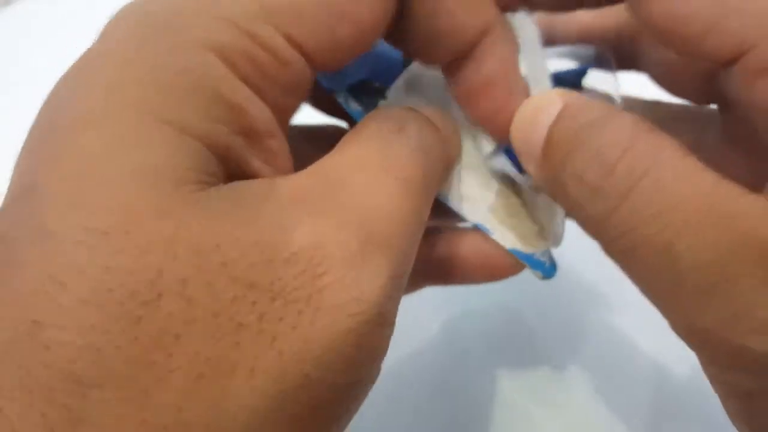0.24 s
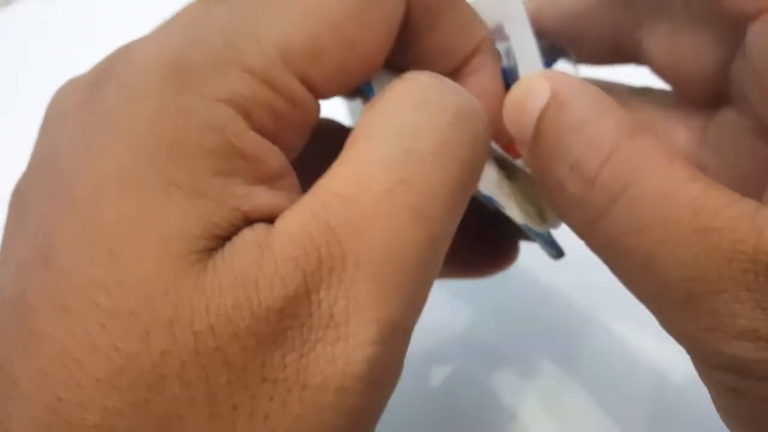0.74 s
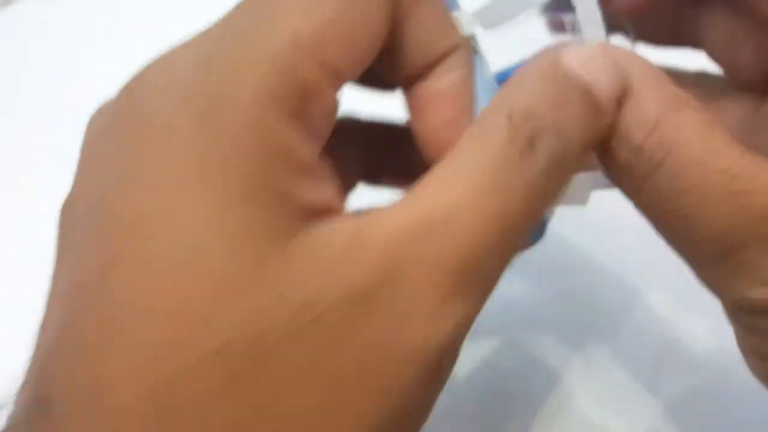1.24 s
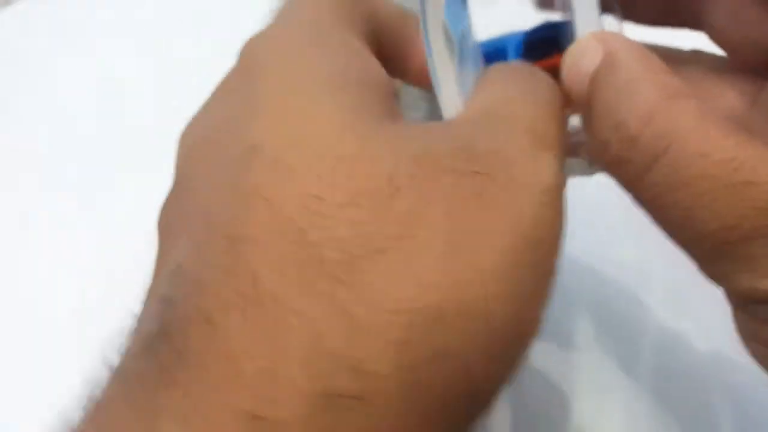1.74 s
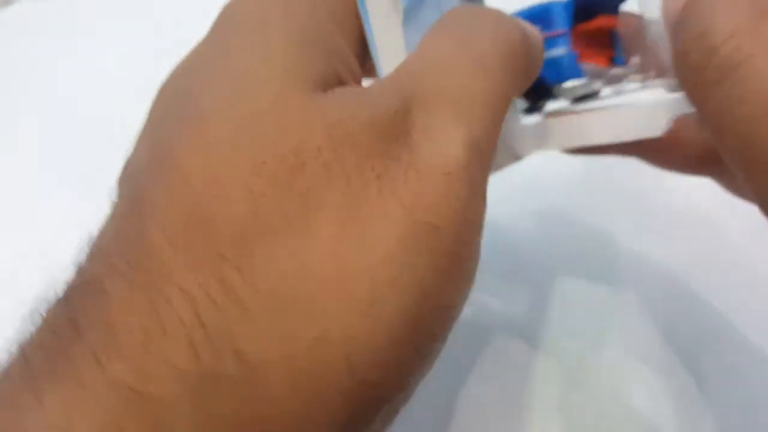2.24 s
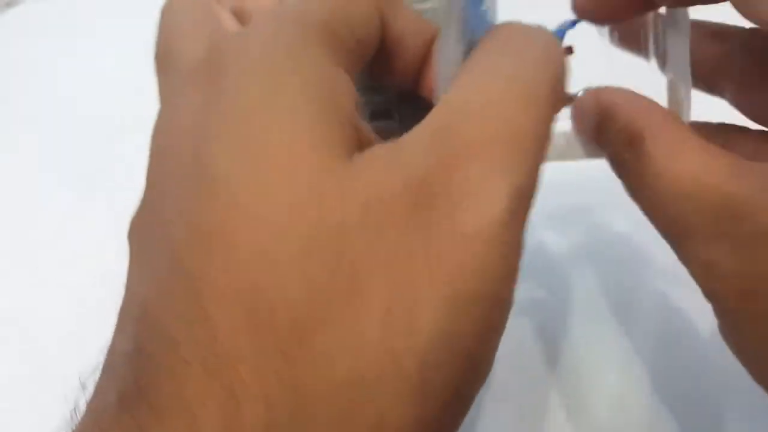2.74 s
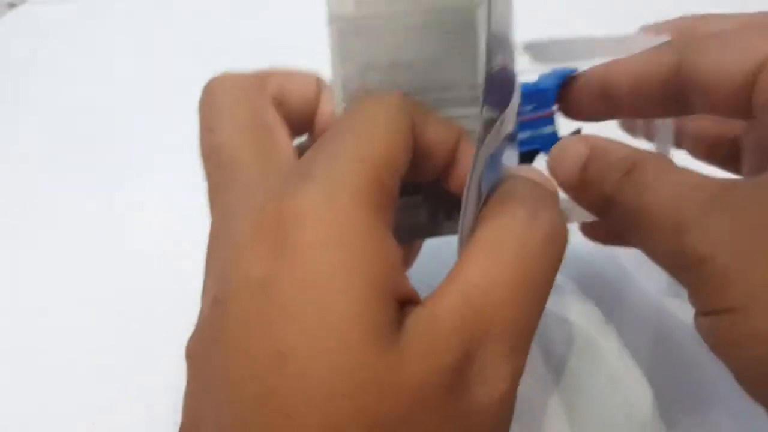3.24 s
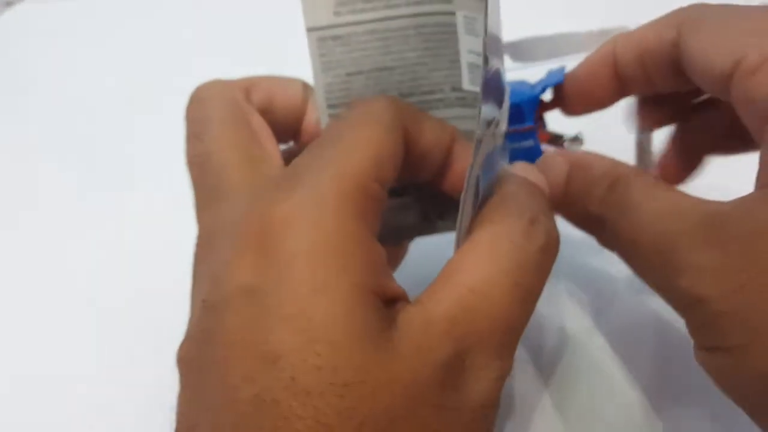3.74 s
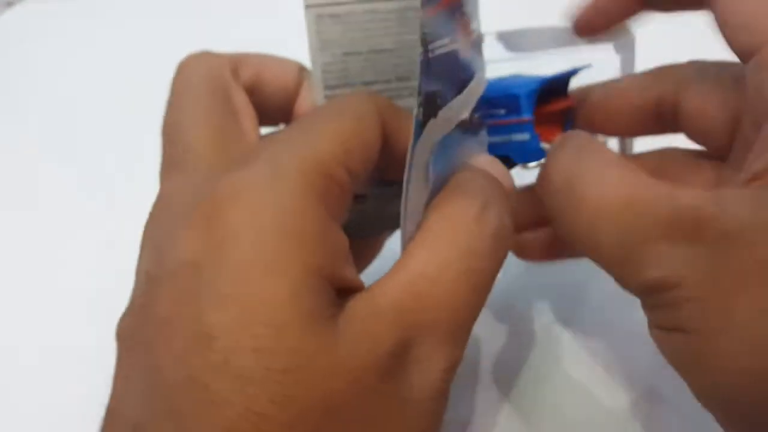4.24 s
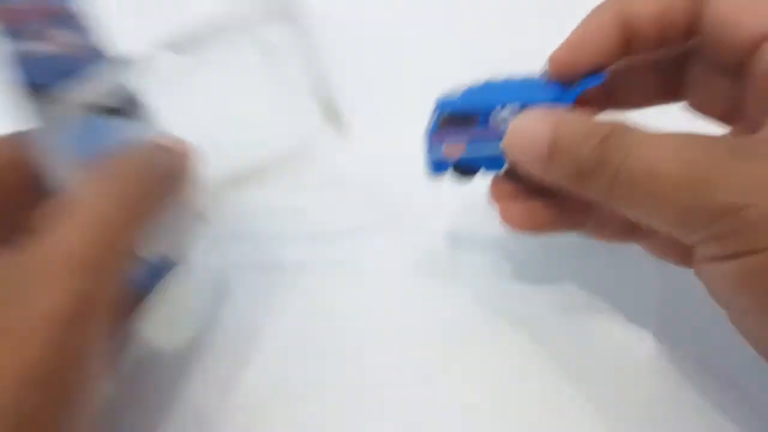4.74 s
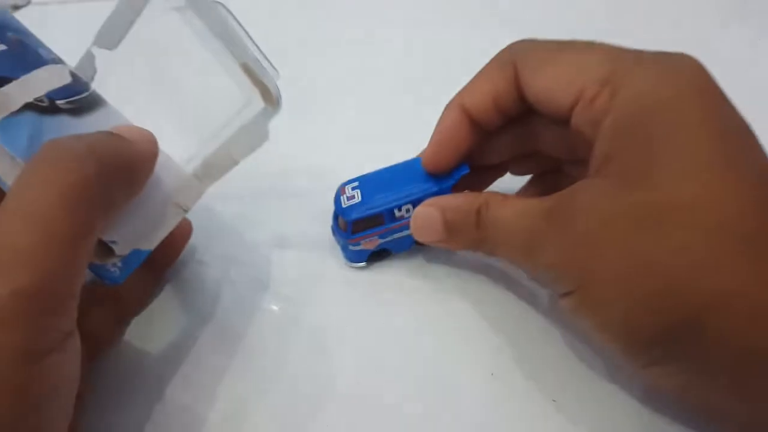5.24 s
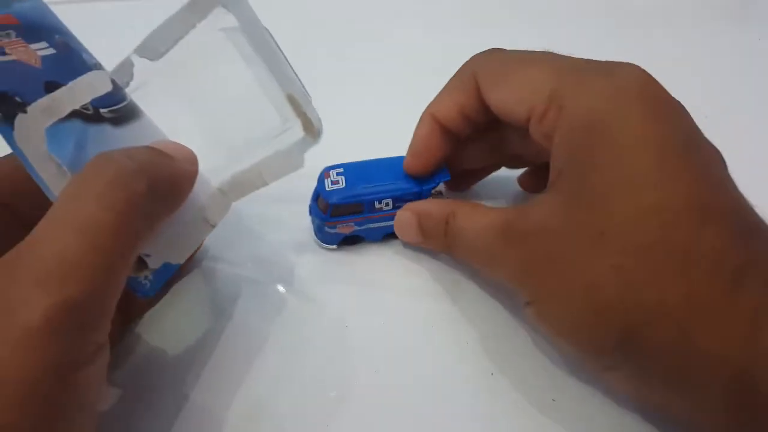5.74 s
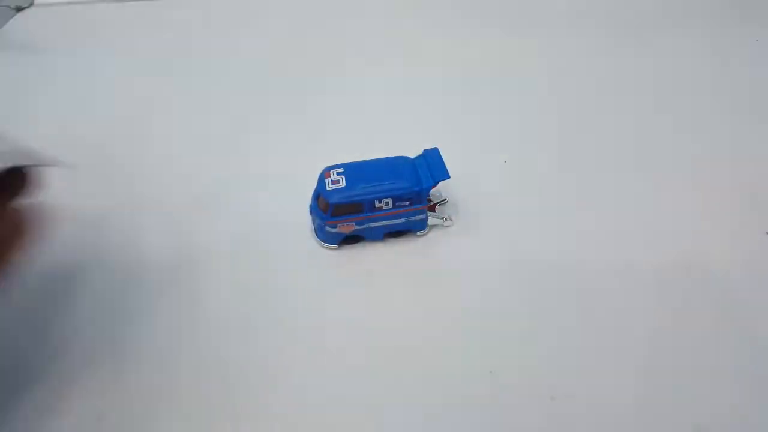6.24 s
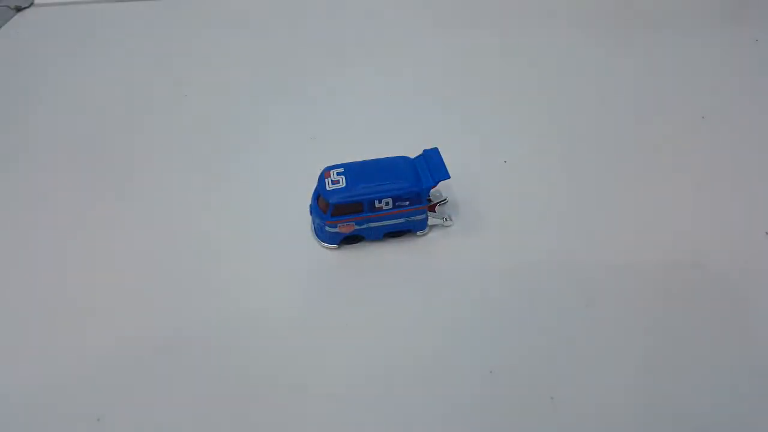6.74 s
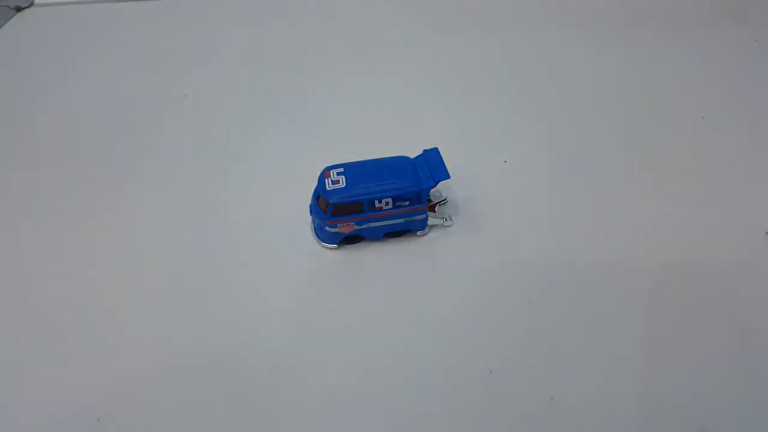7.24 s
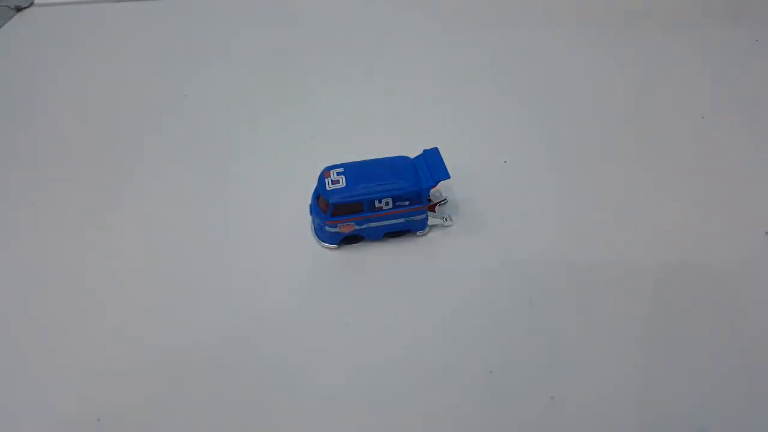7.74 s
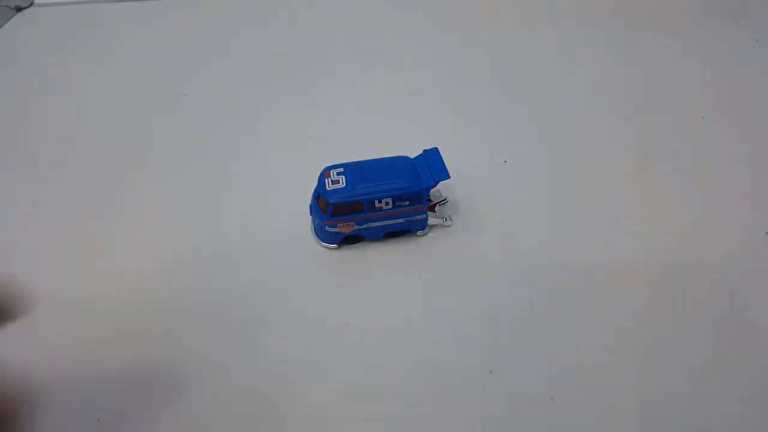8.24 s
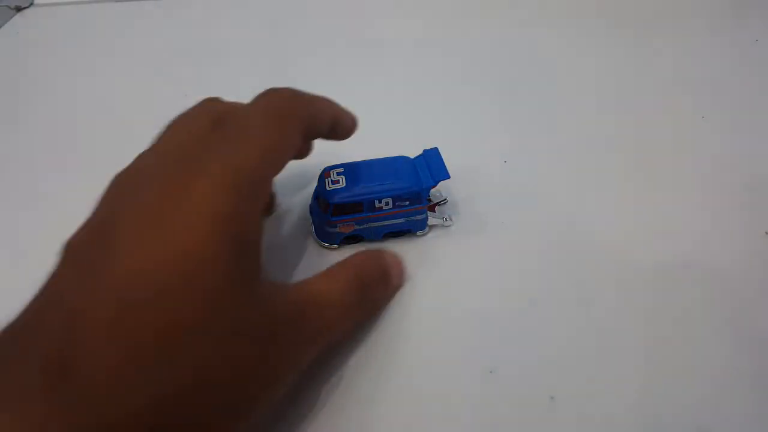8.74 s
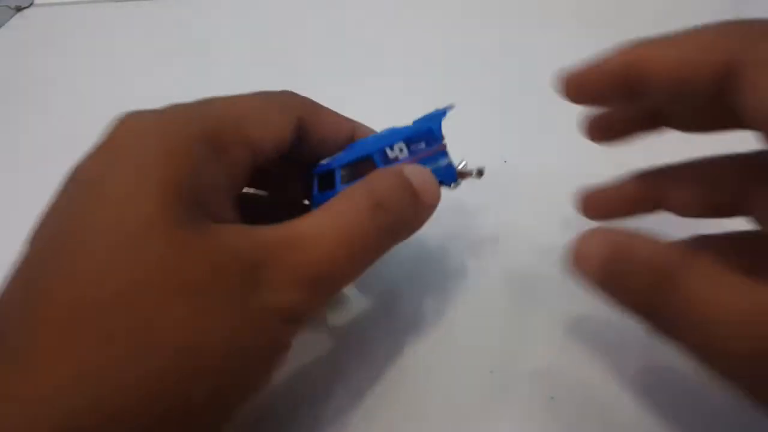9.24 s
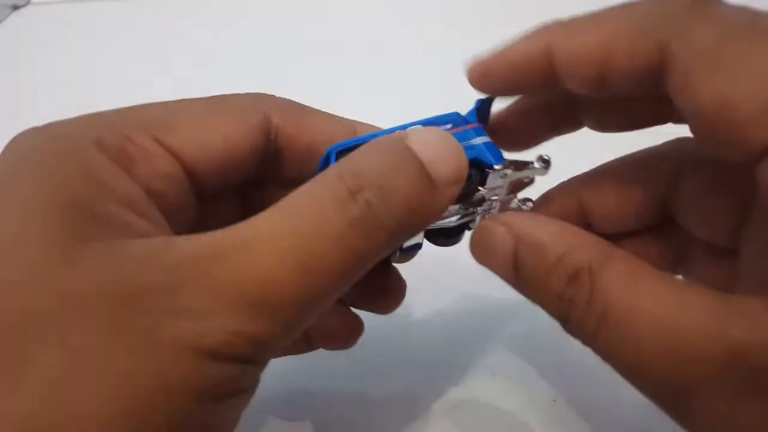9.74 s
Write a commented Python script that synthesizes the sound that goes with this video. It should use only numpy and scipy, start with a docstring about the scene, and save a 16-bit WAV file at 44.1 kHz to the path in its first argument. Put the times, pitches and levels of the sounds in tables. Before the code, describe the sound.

Close stereo microphone in a small quiet room. Stiff plastic and card crackle, snap and rip irregularly in the hands, then one loud hollow pop frees a toy van. Light scrapes follow, a wooden-sounding knock and small taps as it is stood on a table. The empty pack scrapes and lands with crisp clatter to the left. After a near-silent gap, the van is picked up with faint bumps over low traffic drone.

```python
"""Close plastic rubbing, crinkling and snapping: hands peel the card off a blister pack and a toy van pops out.
The van is stood on a table, the empty pack is slid aside and dropped, and the van is picked up again.
Friction is stick-slip noise through resonances; blows are pulses and noise bursts decaying by band;
bubble, shell, dents, metal and table top are decaying sines. A small quiet room adds a noise tail,
and wavering tones make a low drone of traffic outside."""
import sys
import numpy as np
from scipy import signal
from scipy.fft import rfft, irfft
from scipy.io import wavfile
from scipy.ndimage import uniform_filter1d

SR = 44100
rng = np.random.default_rng(int(sys.argv[2]) if len(sys.argv) > 2 else 0)


def transcribe(u):
    """Save the signal u as a 16-bit wav file named by the first command-line argument.

    u: samples, shape (n,) or (channels, n), limited to [-1, 1]; the rate is SR.
    q: integer samples, one column per channel.
    """
    v = np.clip(np.atleast_2d(u).T, -1, 1)
    q = np.round(v * 32767).astype(np.int16)
    wavfile.write(sys.argv[1], SR, q)


N = 440549

# All table levels are relative, ahead of the mix gains.
# Buckles of the bubble and breaks of the glue. Each row: start in seconds, level in dB, pitch in Hz,
# fall either side of the pitch in dB per octave, nominal ring t60 in seconds.
SNAPS = [(0.114, -49.5, 7100, 6.5, 0.074), (0.131, -52, 7100, 6, 0.03), (0.205, -48.5, 1200, 19, 0.0052),
         (0.305, -41.5, 3400, 3, 0.055), (.324, -45, 2000, 2, 0.034), (0.34, -38.5, 2800, 9, 0.05),
         (0.4053, -32.5, 5400, 6.5, 0.0081), (.414, -42, 9200, 2, 0.02), (0.44, -42, 1900, 14, 0.015),
         (0.456, -26, 610, 12, 0.012), (.59, -45, 740, 5, 0.024), (.666, -42.5, 360, 2, 0.073),
         (0.681, -43, 2400, 3, 0.025), (.7235, -44.5, 700, 2.5, .03), (0.7274, -36.5, 840, 2, 0.032),
         (0.7878, -39.5, 430, 3, 0.021), (.806, -43, 1700, 22, 0.035), (0.901, -50.5, 460, 1, 0.068),
         (0.938, -50, 600, 3.5, 0.023), (0.975, -53.5, 7020, 16, 0.024), (0.994, -53, 1300, 0.5, 0.023),
         (1.0626, -51.5, 5500, 0, 0.019), (1.085, -23.5, 3900, 4, 0.04), (1.0905, -25.5, 2600, 5, 0.022),
         (1.112, -32, 570, 1, 0.04), (1.1487, -38.5, 650, 4, 0.04), (1.187, -28.5, 490, 3, 0.035),
         (1.214, -27.5, 1990, 12, 0.018), (1.241, -42, 570, 10, 0.097), (1.416, -41.5, 688, 4, 0.071),
         (1.4302, -39.5, 900, 3, 0.059), (1.518, -38, 690, 3.5, 0.063), (1.584, -36, 1000, 9, 0.11),
         (1.756, -46, 1500, 4.5, 0.086), (1.81, -44, 870, 6, 0.14), (1.93, -47, 740, 0.5, 0.083),
         (1.967, -28.5, 2010, 19, 0.022), (2.012, -37, 360, 13, 0.019), (2.038, -40.5, 4700, 4.5, 0.024),
         (2.0675, -30, 2000, 24, 0.022), (2.08, -51, 9200, 8, .03), (2.176, -55, 900, -4, 0.02),
         (2.2106, -43.5, 790, 3, 0.025), (2.2248, -46.5, 4960, 4, 0.044), (2.305, -42, 2000, 4.5, 0.051),
         (2.328, -42, 1200, 2, 0.037), (2.4997, -47.5, 1300, 3, .05), (2.5941, -33.5, 380, 8, 0.0083),
         (2.775, -48.5, 2400, 3.5, 0.012), (2.841, -53.5, 5000, 4, 0.032), (2.927, -48.5, 570, 4, 0.02),
         (3.0207, -41.5, 1620, 11, 0.039), (3.0634, -43.5, 490, 5.5, 0.036),
         (3.1058, -38, 2400, 6.5, 0.018), (3.2146, -35, 530, 4, 0.043), (3.268, -41, 2100, 1, 0.055),
         (3.2926, -40.5, 960, 6, 0.052), (3.402, -37, 1100, 25, 0.039), (3.444, -36, 750, 4.5, 0.04),
         (3.549, -44, 2050, 12, 0.064), (3.592, -39, 740, 9, 0.1), (3.649, -19.5, 3400, 3.5, 0.013),
         (3.919, -45, 604, 4.5, 0.036), (4.008, -41, 1100, 10, 0.025), (4.108, -65, 6000, 2, 0.011),
         (4.172, -53, 1400, 4, 0.081), (4.209, -61, 3500, 0, .02), (4.27, -49.5, 4400, 4.5, 0.032),
         (4.3439, -51, 890, 3, 0.037), (4.39, -51, 8500, 8, 0.018), (4.4772, -43.5, 1100, 4, 0.038),
         (4.512, -54.5, 7000, 0.5, 0.02), (4.5305, -43.5, 1400, 10, .03), (4.548, -62, 2500, 2, .015),
         (4.611, -44.5, 420, 7, 0.032), (4.631, -54, 455, 8, 0.021), (4.642, -57.5, 4000, 4, .025),
         (4.7, -60.5, 7500, -1, 0.024), (4.826, -61.5, 3600, 7, .02), (4.916, -57.5, 5770, 4, 0.068),
         (4.948, -55.5, 9200, 5, 0.024)]
# The empty pack bumps, lands and settles. Each row: start in seconds, level in dB, pitch in Hz,
# fall in dB per octave, nominal crunch t60 in seconds, ringing of the shell in dB.
LANDINGS = [(6.157, -50, 1700, 1.5, 0.064, -54), (6.211, -43.5, 1940, 3.5, 0.038, -45),
            (6.848, -45, 445, 5, 0.05, -40), (6.8721, -38, 880, 8.5, 0.05, -45),
            (6.874, -54, 2900, 24, .02, -40.5), (7.329, -42.5, 375, 6, 0.13, -42),
            (7.336, -43, 1270, 11, 0.094, -36), (7.3755, -45.5, 1380, 9, 0.065, -39),
            (7.4743, -26, 890, 2, 0.048, -22), (7.492, -33, 960, 8, 0.099, -37),
            (7.5208, -31.5, 3380, 3, 0.077, -42), (7.5499, -42.5, 1900, 2, 0.14, -52),
            (7.6317, -31, 8300, 4, 0.064, -32), (7.636, -51, 3440, 12, .05, -47),
            (7.676, -35.5, 4770, 4.5, 0.046, -36), (7.7004, -33, 9200, 6, 0.046, -46),
            (7.739, -46, 9300, 0.5, 0.23, -52), (7.772, -65, 4200, -4, 0.043, -52)]
# Each new grip of the fingers. Each row: start and end in seconds, rubbing in dB, crinkling in dB.
GRIPS = [(0, 0.188, -67, -59.5), (0.272, 0.349, -51, -57), (0.44, 0.522, -43.5, -51.5),
         (0.7, 0.84, -49.5, -67), (0.927, 1.053, -60, -69), (1.089, 1.141, -44.5, -42.5),
         (1.15, 1.262, -42.5, -56), (1.318, 1.472, -58.5, -75), (1.525, 1.683, -45, -53),
         (1.801, 1.926, -56, -57), (1.964, 2.055, -46.5, -49.5), (2.241, 2.5, -50, -53.5),
         (2.54, 2.687, -56, -61), (2.859, 2.901, -48, -56), (2.938, 3.025, -55.5, -61.5),
         (3.117, 3.158, -52, -64), (3.288, 3.34, -52.5, -63), (3.541, 3.603, -53, -61.5),
         (3.848, 3.9, -46, -52), (3.975, 4.015, -47, -54), (4.166, 4.259, -61.5, -65),
         (4.278, 4.508, -57, -62.5), (4.625, 4.722, -60.5, -68), (4.872, 4.923, -69, -70)]
# Broad resonances of the held pack. Each row: centre in Hz, width in Hz, peak in dB.
HELD_PACK = [(545, 43, 6.5), (1150, 110, 5.5), (1870, 370, -5.5), (2530, 380, 7.5), (3240, 220, 1),
             (7060, 370, 4)]
# The small pack radiates little bass. Each row: frequency in Hz, gain in dB.
RADIATION = [(120, -16), (200, -2), (300, -3), (450, -0.5), (1500, -0.5), (3000, -1), (16000, -4)]


def amp(db):
    """Decibels to gain."""
    return 10 ** (np.asarray(db) / 20)


def unit(x):
    """Scales to rms 1."""
    return x / np.sqrt(np.mean(x ** 2) + 1e-20)


def fade(t, t60):
    """Exponential decay, down 60 dB after t60 seconds."""
    return np.exp(-np.log(1000) * t / t60)


def read(points, hz):
    """Reads a table on a log-frequency axis."""
    f, value = np.transpose(points)
    return np.interp(np.log(hz + 1), np.log(f + 1), value)


def follow(rows):
    """The columns of a curve at every sample."""
    s, *columns = np.transpose(rows)
    return [np.interp(np.arange(N) / SR, s, c) for c in columns]


def add(mix, s, sound):
    """Mixes a stereo sound in at time s."""
    part = mix[:, max(round(s * SR), 0):][:, :sound.shape[1]]
    part += sound[:, :part.shape[1]]


def pan(side_db):
    """Left and right gains; side_db is left over right."""
    gains = amp(np.array([[side_db], [-side_db]]) / 2)
    return unit(gains)


def colour(x, spectrum):
    """Filters by a smooth spectrum."""
    return irfft(rfft(x) * amp(read(spectrum, np.fft.rfftfreq(N, 1 / SR))), N)


def stereo_noise():
    """White noise, alike in both channels in the bass and unrelated in the treble."""
    # Likeness of the two channels. Each row: frequency in Hz, correlation from 0 to 1.
    likeness = [(100, 0.96), (600, 0.82), (1200, 0.2), (2200, 0), (4000, 0), (16000, 0.01)]
    left, other = rfft(rng.standard_normal((2, N)))
    same = np.clip(read(likeness, np.fft.rfftfreq(N, 1 / SR)), 0, 1)
    right = same * left + np.sqrt(1 - same ** 2) * other
    return irfft(np.array([left, right]), N)


def wander(per_s):
    """Slow random drift of rms 1, smoothed over 1 / per_s seconds."""
    size = max(int(SR / per_s), 1)
    return unit(uniform_filter1d(uniform_filter1d(rng.standard_normal(N), size), size))


def ring(x, body):
    """Adds the resonances of a body to what excites it."""
    return x + sum((amp(db) - 1) * signal.lfilter(*signal.iirpeak(hz, hz / width, SR), x)
                   for hz, width, db in body)


def port_lag(x, size):
    """Sound from the left reaches the right microphone a few samples later."""
    return np.array([x[0], np.pad(x[1], (size, 0))[:N]])


def room(x, delay_s):
    """Dense reflections of a small room, each band dying at its own speed."""
    # Reverberation. Each row: frequency in Hz, t60 in seconds.
    reverb_t60 = [(150, 1), (500, 0.47), (1400, 0.61), (4000, 0.58), (9000, 0.46), (16000, 0.5)]
    hz, t, z = signal.stft(rng.standard_normal((2, SR * 3 // 4)), SR, nperseg=256)
    tail = signal.istft(z * fade(t, read(reverb_t60, hz)[:, None]), SR, nperseg=256)[1]
    # silent for delay_s, full after twice that
    tail *= np.clip(np.arange(tail.shape[1]) / SR / delay_s - 1, 0, 1)
    return signal.fftconvolve(x, tail / np.linalg.norm(tail[0]), axes=1)[:, :N]


def slips(per_s, spread_db, smooth, length_s):
    """Stick and slip: sparse tiny bursts of very unequal size over a smooth hiss."""
    sizes_db = spread_db * np.minimum(rng.exponential(1, N), 4)
    sizes = amp(sizes_db) * (rng.random(N) < per_s / SR)
    bursts = signal.lfilter([1], [1, -np.exp(-1 / (length_s * SR))], sizes)
    return unit(stereo_noise() * (unit(bursts) + smooth))


def shifting(x, depth_db, size):
    """A flexing sheet favours other pitches from moment to moment."""
    z = signal.stft(x, SR, nperseg=256)[2]
    patches = uniform_filter1d(rng.standard_normal(z.shape[1:]), size, axis=1)
    patches = unit(uniform_filter1d(patches, size=3, axis=0))
    return signal.istft(z * amp(depth_db * np.clip(patches, -2, 2)), SR, nperseg=256)[1][:, :N]


def friction(strokes, attack_s, release_s, body, walls, rub_colour, rub_grain, crinkle_grain):
    """Each stroke swells, holds and lets go: dull rubbing rings the body, bright crinkling the walls."""
    # Colour of crinkling. Each row: frequency in Hz, density in dB per Hz.
    crinkle_colour = [(500, -40.5), (2000, -13), (2900, -3.5), (3500, -1), (5000, -0.5), (6000, -4.5),
                      (8300, -9), (9800, -8), (14500, -12), (16000, -20.5)]
    t, power = np.arange(0, N / SR, .001), 0
    for start, end, *levels_db in strokes:
        outside = np.maximum(start - t, 0) / attack_s + np.maximum(t - end, 0) / release_s
        power = power + (amp(levels_db)[:, None] * np.exp(-outside)) ** 2
    rub, crinkle = follow(np.vstack([t, np.sqrt(power)]).T)
    rub = rub * unit(colour(ring(rub_grain, body), rub_colour))
    crinkle = crinkle * unit(colour(ring(crinkle_grain, walls), crinkle_colour))
    return amp(-1) * shifting(rub + crinkle, depth_db=3.5, size=10)


def blows(rows, body, side, push, rise, damping, flutter, flex, treble_side_db):
    """A sharp push and dense sheet vibration around a pitch; high bands die sooner, weak flutter follows."""
    # Edges of the bands, in Hz.
    band_edges = [180, 700, 2000, 5500, 15500]
    fold_db, fold_width = 6, .1  # each fold rings near the pitch; width as a share of it
    rattle_db, rattle_per_s = 6, 350  # uneven spurts of the flutter
    out, noise, size = np.zeros((2, N)), stereo_noise(), SR // 8
    t, attack = np.arange(size) / SR, SR // 100
    edges = np.transpose([band_edges[:-1], band_edges[1:]])
    centres_hz = np.sqrt(edges.prod(axis=1))
    bands = [signal.butter(3, pair, "band", fs=SR, output="sos") for pair in edges]
    bends = np.exp(flex * (2 * rng.random(len(rows)) - 1))  # bending the sheet retunes it
    rattle = unit(amp(rattle_db * np.clip(wander(rattle_per_s), -2, 2)))
    pulse = push * np.exp(-((t - .0004) / 0.000092) ** 2)
    for i, (s, level_db, pitch_hz, fall_db, t60) in enumerate(rows):
        offset = i * size % (N - size)
        chance = noise[:, offset:][:, :size]
        spurts = rattle[offset:][:size]
        fold_hz = min(pitch_hz, band_edges[-1])
        bent = [(hz * bends[i], width, db) for hz, width, db in body]
        bent += [(fold_hz, fold_width * fold_hz, fold_db)]
        octaves = abs(np.log2(centres_hz / pitch_hz))
        levels_db = level_db - max(fall_db, 0) * (octaves - octaves.min())
        side_db = np.interp(s, *np.transpose(side))
        # long crunches also build up more slowly than short snaps
        swell = 1 - np.exp(-t / (rise * t60))
        for k, (band, db) in enumerate(zip(bands, levels_db)):
            band_t60 = t60 * damping ** (k - 1)
            shape = swell * (fade(t, band_t60) + flutter * spurts * fade(t, 4 * band_t60))
            burst = signal.sosfilt(band, ring(pulse + chance * shape, bent))
            strength = np.sqrt(np.mean(burst[:, :attack] ** 2, axis=1, keepdims=True))
            add(out, s, amp(db) * pan(side_db + treble_side_db * (k - 1)) * burst / strength)
    return out


def chime(modes, side_db):
    """A struck thin wall: dying sines whose pitches wobble as it flexes."""
    wobble_share, wobble_s = .011, .01  # rms share of the pitch, smoothing time
    t, size = np.arange(SR // 3) / SR, round(wobble_s * SR)
    wobbles = wobble_share * unit(uniform_filter1d(rng.standard_normal((len(modes), len(t))), size))
    out = np.zeros((2, len(t)))
    for (hz, db, t60), side, wobble in zip(modes, side_db, wobbles):
        turns = hz * np.cumsum(1 + wobble) / SR + rng.random()
        out += amp(db) * pan(side) * fade(t, t60) * np.sin(2 * np.pi * turns)
    return out * (1 - np.exp(-t / 0.0004))


def wavering(curve, flicker_db, flicker_per_s, drift, drift_per_s):
    """A distant tone whose level (rms dB) and pitch (rms share) wander."""
    hz, db = follow(curve)
    turns = np.cumsum(hz * (1 + drift * wander(drift_per_s))) / SR
    return amp(db + flicker_db * wander(flicker_per_s)) * unit(np.sin(2 * np.pi * turns))


def background():
    """Room air as shaped noise, and the wavering drone, whine and hum of traffic outside."""
    # Engine, falling whine, low hum and thin steady tone.
    # Each row: time in seconds, pitch in Hz, level in dB.
    engine = [(0, 88, -99), (4.2, 88, -70), (4.6, 83.67, -55.5), (5.3, 81.2, -58.5), (5.8, 80, -62.5),
              (7.1, 66, -62.5), (7.5, 67.07, -48.5), (8.0, 72.93, -58), (8.5, 70.54, -68),
              (8.95, 68, -53.5), (9.3, 68.9, -45), (9.47, 65.6, -52), (9.7, 68.2, -48.5), (10, 68.3, -53)]
    whine = [(7.8, 865, -84), (7.97, 840, -74), (8.13, 812, -72.5), (8.38, 762, -75), (8.6, 735, -78),
             (8.8, 690, -95)]
    hum = [(9.3, 362.5, -110), (9.52, 372, -73.5), (10, 369.6, -72)]
    thin_tone = [(7.7, 1835, -100), (8.0, 1835, -81), (8.7, 1830, -84), (8.95, 1830, -100)]
    # Still air. Each row: frequency in Hz, density in dB per Hz.
    air = [(20, -33), (45, -13.5), (75, -9), (118, -4), (170, -20), (300, -25), (500, -26.5), (1000, -31.5),
           (1900, -32), (3400, -38), (7300, -50), (12000, -45.5), (16000, -57.5)]
    drone = wavering(engine, flicker_db=1.8, flicker_per_s=6.9, drift=.04, drift_per_s=16)
    tones = sum(wavering(curve, flicker_db=2.5, flicker_per_s=30, drift=.025, drift_per_s=120)
                for curve in (whine, hum))
    thin = wavering(thin_tone, flicker_db=2.5, flicker_per_s=30, drift=.01, drift_per_s=120)
    return drone + tones + thin + amp(-59) * unit(colour(stereo_noise(), air))


def held_pack():
    """Snaps, rips and rubbing of the pack in the hands: blows and friction through its resonances."""
    # Where the pack is bent. Each row: time in seconds, left over right in dB.
    pack_side = [(0.4, 3), (1.2, 2.5), (2.9, 0), (3.4, -1.5), (3.65, -3), (4.9, 3)]
    # Small shifts for as long as it is held.
    # Each row: start and end in seconds, rubbing in dB, crinkling in dB.
    holding = [(0.0032, 4.55, -63, -68.5), (4.55, 4.9, -63, -71.5)]
    # Colour of rubbing. Each row: frequency in Hz, density in dB per Hz.
    rub = [(100, -16), (250, -2.5), (520, -4), (1200, -1), (2700, -7.5), (3500, -7), (7000, -31),
           (16000, -54.5)]
    ticks = stray_ticks(count=2, above_db=-3.5, low_hz=1500, high_hz=9000, fall_db=6.5, t60=0.011)
    snaps = blows(SNAPS + ticks, HELD_PACK, pack_side, push=0.91, rise=0.014, damping=.75,
                  flutter=.17, flex=0.082, treble_side_db=1.0)
    snaps = amp(-1.5) * snaps + amp(-7.0) * straining(lead_s=0.0017, side_db=1.0)
    handling = friction(GRIPS + holding, attack_s=0.015, release_s=0.013,
                        body=HELD_PACK, walls=[], rub_colour=rub,
                        rub_grain=slips(per_s=300, spread_db=3.5, smooth=0.5, length_s=0.0018),
                        crinkle_grain=slips(per_s=500, spread_db=1.0, smooth=0.98, length_s=0.0013))
    mix = colour(snaps, RADIATION) + amp(-2.0) * pan(1.0) * handling
    mix += amp(1.5) * rips() + creak() + pan(2.0) * peeling()
    return port_lag(mix, size=2)


def peeling():
    """Threads of glue part in a fine, high sizzle as the card peels off."""
    # Peels. Each row: start and end in seconds, level in dB.
    peels = [(0, 0.19, -58), (1.077, 1.15, -47), (1.845, 1.878, -50), (1.97, 2.079, -46.5),
             (2.2, 2.34, -55), (3.866, 3.887, -62)]
    # Colour of the sizzle. Each row: frequency in Hz, density in dB per Hz.
    sizzle = [(3000, -24), (7000, -8), (10000, -8), (14500, 1.5), (16000, -3.5)]
    t, edge_s, pull = np.arange(N) / SR, 0.0099, 0
    for start, end, db in peels:
        pull = pull + amp(db) * np.interp(t, [start - edge_s, start, end, end + edge_s], [0, 1, 1, 0])
    return pull * unit(colour(slips(per_s=400, spread_db=4, smooth=.6, length_s=.001), sizzle))


def stray_ticks(count, above_db, low_hz, high_hz, fall_db, t60):
    """A few small creases give way at random during every grip; rows like those of SNAPS."""
    draws, rows = rng.random((len(GRIPS), count, 2)), []
    for (start, end, _, crinkle_db), ticks in zip(GRIPS, draws):
        for when, pitch in ticks:
            pitch_hz = low_hz * (high_hz / low_hz) ** pitch
            rows.append((start + when * (end - start), crinkle_db + above_db, pitch_hz, fall_db, t60))
    return rows


def straining(lead_s, side_db):
    """Plastic crackles for a moment just before each snap gives way, most before the bright ones."""
    t, strain = np.arange(SR // 20) / SR, np.zeros((2, N))
    for s, db, pitch_hz, fall_db, _ in SNAPS:
        crack_db = db - fall_db * max(np.log2(2800 / pitch_hz), 0)
        add(strain, s - t[-1], amp(crack_db) * pan(side_db) * np.exp((t - t[-1]) / lead_s))
    crackle = slips(per_s=1700, spread_db=4.0, smooth=.4, length_s=0.00054)
    crackle = colour(crackle, [(200, -8.5), (1000, -3.5), (3000, -0.5), (8000, -1.5),
                               (10000, -9.0), (16000, -18.5)])
    return strain * unit(crackle)


def dents():
    """A dent springs out: a short hollow tone that bends upward as the wall tightens."""
    # Dents. Each row: start in seconds, level in dB, settled pitch in Hz, t60 in seconds.
    dent_rows = [(0.457, -37.5, 486, 0.15), (0.462, -38, 453, 0.031), (.668, -43, 350.4, 0.054),
                 (0.729, -42, 556, 0.038), (0.7888, -47, 455, 0.049), (1.101, -33, 618, 0.056),
                 (1.1884, -29.5, 506, 0.096), (1.519, -43, 310, .06), (1.9685, -29.5, 1520, 0.028),
                 (2.0685, -23.5, 1475, 0.025), (2.5944, -34, 398, 0.075), (3.2153, -41, 520, 0.045),
                 (3.404, -37, 692, 0.065), (3.409, -34.5, 916, 0.044), (3.444, -47.5, 420, 0.088),
                 (3.6501, -15.5, 1390, 0.025), (4.0077, -45, 1010, 0.024)]
    # Tones of a dent. Each row: multiple of the pitch, level in dB.
    dent_tones = [(1, 3.5), (1.74, -1.5), (2.95, -17)]
    flat_share, settle_s = .17, 0.008  # starts flat by this share of the pitch
    t, out = np.arange(SR // 4) / SR, np.zeros((2, N))
    for s, db, hz, t60 in dent_rows:
        turns = np.cumsum(hz * (1 - flat_share * np.exp(-t / settle_s))) / SR
        tones = sum(amp(tone_db) * np.sin(2 * np.pi * k * turns) for k, tone_db in dent_tones)
        add(out, s, amp(db) * pan(0) * tones * fade(t, t60))
    return out


def rips():
    """Card fibres break in a quick, squeaky run that grows until the strip lets go."""
    # Short rips. Each row: start and end in seconds, level in dB, squeak in Hz.
    rip_rows = [(1.554, 1.599, -44, 2490), (1.635, 1.663, -37, 3240), (1.982, 2.005, -38, 3350),
                (2.34, 2.4, -30, 1780), (3.258, 3.301, -43.5, 1360)]
    t, out = np.arange(N) / SR, np.zeros((2, N))
    fibres = ring(slips(per_s=1700, spread_db=2.2, smooth=.5, length_s=0.0004), HELD_PACK)
    fibres = colour(fibres, [(150, -23.0), (600, -6.5), (1500, -1), (2600, -6.5), (3500, -10.5),
                             (8000, -18.5), (15000, -27.0)])
    for start, end, db, hz in rip_rows:
        pull = np.interp(t, [start, end - .008, end + 0.0036], [0, 1, 0])
        out += amp(db) * pull * unit(ring(fibres, [(hz, 500, 12)]))  # Hz, width in Hz, dB
    return out


def creak():
    """A fingertip sticks and slips on the plastic: a faint, rough rising tone."""
    # Squeak as the grip shifts. Each row: time in seconds, pitch in Hz, level in dB.
    squeak = [(2.775, 160, -110), (2.795, 190, -57), (2.825, 260, -55), (2.85, 295, -63),
              (2.875, 300, -110)]
    return wavering(squeak, flicker_db=4, flicker_per_s=250, drift=.09, drift_per_s=300)


def pop():
    """The emptied bubble rings like a small drum, and its torn rim buzzes along."""
    # The bubble springs back as the van comes free: time in seconds, level in dB.
    pop_s, pop_db = (3.6505, -13.5)
    # Modes of the bubble. Each row: frequency in Hz, level in dB, t60 in seconds.
    bubble = [(243, -24, .16), (502, -20, .1), (590, -13, .12), (613, -0.5, .135), (636, -11, .14),
              (720, -15, .12), (807, -14, .15), (861, -15, .11), (926, -16, .17), (1130, -14, .14),
              (1166, -3, .05), (1283, -3, .06), (1312, -13, .15), (1357, -9, .09), (1410, -4, .05),
              (1518, -15, .16), (1566, -6, .05), (1696, -17, .1), (2046, -11, .05), (2288, -19, .11),
              (2790, -14, .04), (3407, -12, .035), (3940, -14, .03), (4700, -14, .03)]
    # Its radiation. Each row: frequency in Hz, left over right in dB.
    bubble_side = [(250, 0), (620, -5.5), (1300, 1.5), (2800, 3)]
    # Colour of the rim buzz. Each row: frequency in Hz, density in dB per Hz.
    rim = [(300, -29.5), (600, -13), (800, -4), (1000, -11), (1300, 0), (1600, 2.5), (1900, -14),
           (2500, -11.5), (4500, -24), (16000, -61.5)]
    rim_db, rim_t60_s = -31, .3
    out, t = np.zeros((2, N)), np.arange(SR // 2) / SR
    buzz = unit(colour(slips(per_s=900, spread_db=2, smooth=.6, length_s=.001), rim))[:, :len(t)]
    add(out, pop_s, amp(pop_db) * chime(bubble, [read(bubble_side, hz) for hz, _, _ in bubble]))
    add(out, pop_s, amp(rim_db) * buzz * fade(t, rim_t60_s))
    return out


def scrapes():
    """The van's edges stick and slip on the bubble, later the table, each scrape with its own pitch."""
    # Scrapes. Each row: start and end in seconds, level in dB, pitch in Hz, tilt in dB per octave.
    scrape_rows = [(4.26, 4.32, -55, 2520, -6), (4.327, 4.345, -50.5, 2000, -10),
                   (4.364, 4.388, -46, 3400, -4.5), (4.453, 4.492, -56, 3300, -9),
                   (8.952, 8.977, -56.5, 1380, -8.5), (9.007, 9.077, -64, 1380, -9),
                   (9.14, 9.26, -69, 1400, -7)]
    # Resonances of the scraped wall. Each row: multiple of the pitch, width in Hz, peak in dB.
    scraped_wall = [(1, 170, 16), (1.45, 260, 11), (2.3, 500, 8)]
    t, out = np.arange(N) / SR, np.zeros((2, N))
    grain = slips(per_s=600, spread_db=3, smooth=.25, length_s=.0005)
    for start, end, db, hz, tilt_db in scrape_rows:
        wall = ring(grain, [(k * hz, width, peak_db) for k, width, peak_db in scraped_wall])
        wall = colour(wall, [(200, -15), (1000, 0), (8000, 3 * tilt_db), (16000, 3 * tilt_db - 14)])
        stroke = np.interp(t, [start - .003, start, end, end + .008], [0, 1, 1, 0])
        out += amp(db) * stroke * unit(wall)
    return out


def van():
    """The toy knocks, rolls, scrapes and clinks: blows ring the table, friction makes the rumble."""
    # Wheels and fingers knock the van on the table. Each row: start in seconds, level in dB,
    # pitch in Hz, fall in dB per octave, nominal ring t60 in seconds.
    van_knocks = [(5.3015, -37, 363, 6, 0.043), (5.495, -57, 1500, 7.5, .05),
                  (5.5067, -46.5, 800, 10, 0.028), (5.57, -64, 1900, 10, .03),
                  (5.5885, -40.5, 1400, 9.5, 0.05), (5.6323, -42, 1425, 7, 0.044),
                  (5.8216, -62, 355, 16, 0.04), (8.949, -46, 600, 15.5, 0.047),
                  (8.9605, -48.5, 750, 10, 0.06), (8.9763, -49, 357, 8, 0.049),
                  (9.0105, -55, 1830, 21, 0.022), (9.021, -49.5, 620, 13, 0.048),
                  (9.053, -58, 908, 2, 0.063), (9.9145, -57.5, 9320, 1.5, 0.025)]
    # Resonances of the table. Each row: centre in Hz, width in Hz, peak in dB.
    table = [(175.4, 11, 34), (197, 11, 14.8), (233, 5.2, 24), (559, 34, 19.3), (567, 21, 3.3),
             (754, 23, 15.4), (2870, 320, 11)]
    # Rolled on the table, then turned in the fingers.
    # Each row: start and end in seconds, rumbling in dB, scuffing in dB.
    van_moves = [(5.33, 5.45, -57.5, -82), (5.48, 5.53, -51.5, -78), (5.59, 5.63, -49.5, -80),
                 (5.68, 5.79, -58, -84.5), (8.96, 9.06, -50.5, -79), (9.06, 9.3, -55.5, -73),
                 (9.36, 10, -59, -82), (9.83, 9.97, -71, -68.5)]
    # Colour of rolling. Each row: frequency in Hz, density in dB per Hz.
    roll = [(30, 7), (50, 11), (120, -1.5), (200, 0.5), (330, -4), (600, -7.5), (1600, -15), (3000, -22),
            (8000, -39)]
    knocks = blows(van_knocks, table, [(0, 2.2)], push=0.69, rise=0.02, damping=0.87,
                   flutter=0.084, flex=0.019, treble_side_db=0.5)
    rolling = friction(van_moves, attack_s=0.028, release_s=0.042, body=[], walls=[], rub_colour=roll,
                       rub_grain=slips(per_s=400, spread_db=2.0, smooth=1.0, length_s=.002),
                       crinkle_grain=slips(per_s=410, spread_db=2, smooth=.8, length_s=0.00085))
    return amp(-2.5) * knocks + clinks() + scrapes() + amp(-4.0) * rolling


def thuds():
    """The table top booms in its low modes under the heavier blows."""
    # Booms. Each row: start in seconds, level in dB.
    thud_rows = [(5.302, -33.5), (5.508, -49), (5.595, -48), (5.637, -46), (5.819, -52.5), (7.475, -43.5),
                 (8.954, -49.5), (8.9742, -42), (9.017, -45)]
    # Low modes. Each row: frequency in Hz, level in dB, t60 in seconds.
    table_top = [(125, -12, 0.28), (160, 2, 0.14), (221, 1.5, 0.13), (248.5, 2.5, 0.11), (282, -8.5, 0.34)]
    t, out = np.arange(SR // 2) / SR, np.zeros((2, N))
    boom = sum(amp(db) * np.sin(2 * np.pi * hz * t) * fade(t, t60) for hz, db, t60 in table_top)
    for s, db in thud_rows:
        add(out, s, amp(db) * pan(0) * boom)
    return out


def clinks():
    """Tiny bright rings of the van's loose metal parts."""
    # Clinks. Each row: start in seconds, level in dB.
    clink_rows = [(5.609, -52), (5.6156, -54), (9.2965, -64), (9.306, -60)]
    # Modes of the metal. Each row: frequency in Hz, level in dB, t60 in seconds.
    metal = [(5000, -1, .025), (5380, -2.5, .028), (5750, -4, .02), (6600, -8, .02), (8150, -12, 0.016)]
    out = np.zeros((2, N))
    for s, db in clink_rows:
        add(out, s, amp(db) * chime(metal, [0] * len(metal)))
    return out


def loose_pack():
    """The empty pack scrapes over the table and drops: friction, blows and ringing thin walls."""
    # Pushes over the table. Each row: start and end in seconds, scraping in dB, crinkling in dB.
    shoves = [(6.09, 6.14, -56.5, -73), (6.16, 6.21, -50.5, -62), (6.37, 6.42, -52.5, -53),
              (6.44, 6.51, -45.5, -53), (6.58, 7.06, -61.5, -70), (7.15, 7.19, -56.5, -69.5),
              (7.35, 7.41, -50, -62.5), (7.49, 7.66, -53, -69), (7.69, 7.79, -71, -40.5)]
    # Resonances of the loose pack, and of its thin walls for the crinkles.
    # Each row: centre in Hz, width in Hz, peak in dB.
    pack_body = [(305.6, 28, 10.6), (530.5, 18, 12), (839, 80, 7.9), (1180, 170, 8.2), (1430, 39, 3.8),
                 (1500, 34, 2.8), (3210, 160, 4.6), (4830, 850, 1.5)]
    thin_walls = [(3500, 180, 6), (4400, 930, 3.5), (8800, 250, 5), (14000, 4300, 5)]
    # Colour of scraping. Each row: frequency in Hz, density in dB per Hz.
    scrape = [(100, -3), (300, -14), (600, -7), (900, -6.5), (1400, -0.5), (2400, -3.5), (3300, -6.5),
              (4500, -21), (8000, -16.5), (16000, -53)]
    landing = blows([row[:-1] for row in LANDINGS], pack_body, [(0, 2.4)], push=0.99, rise=0.011,
                    damping=0.85, flutter=.19, flex=0.0083, treble_side_db=1.0)
    sliding = friction(shoves, attack_s=0.044, release_s=0.035,
                       body=pack_body, walls=thin_walls, rub_colour=scrape,
                       rub_grain=slips(per_s=1800, spread_db=5.5, smooth=0.55, length_s=0.0012),
                       crinkle_grain=slips(per_s=840, spread_db=2.5, smooth=.9, length_s=0.0012))
    mix = amp(-2.5) * colour(landing, RADIATION) + amp(-2.0) * shell()
    return port_lag(mix + amp(-3.5) * pan(3.8) * sliding, size=18)


def shell():
    """Each landing rings the modes of the empty pack near its pitch, more narrowly than its crunch."""
    # Modes free to ring once it is let go. Each row: frequency in Hz, level in dB, t60 in seconds.
    shell_modes = [(345, -6, .16), (533, -6, .2), (851, -5, .17), (1183, -11, .18), (1405, -8, .3),
                   (1540, -12, .25), (1696, -7, .2), (1793, -10, .17), (2930, -4, .07), (3440, -8, .1),
                   (4560, -10, .08), (8140, -4, .06)]
    focus_db = 3  # extra fall per octave
    out = np.zeros((2, N))
    for s, _, pitch_hz, fall_db, _, ringing_db in LANDINGS:
        modes = [(hz, db - (fall_db + focus_db) * abs(np.log2(hz / pitch_hz)), t60)
                 for hz, db, t60 in shell_modes]
        add(out, s, amp(ringing_db) * chime(modes, [1.6] * len(modes)))
    return out


def scene():
    """The pack in the hands and the van are near; the empty pack lies further off to the left."""
    near = held_pack() + colour(dents(), RADIATION) + van()
    far, popped = loose_pack(), pop()
    near_room = room(amp(-11.0) * near + amp(-13) * popped, delay_s=0.0012)
    far_room = amp(-6.5) * room(far, delay_s=0.0015)
    return near + popped + near_room + far + far_room + thuds() + background()


def record(dry):
    """The microphone's colour, then the recorder's band limit."""
    # Presence of the microphone. Each row: frequency in Hz, gain in dB.
    microphone = [(2000, -1), (2600, -1), (4000, -1.5), (5600, -1), (8200, 4.5), (9800, -4.5),
                  (12000, -2.5), (16000, -9)]
    cutoff_hz = 16000
    low_pass = signal.firwin(511, cutoff_hz, window=("kaiser", 9), fs=SR)
    return signal.oaconvolve(colour(dry, microphone), low_pass[None], "same")


dry = scene()
out = record(dry)
transcribe(out)
```